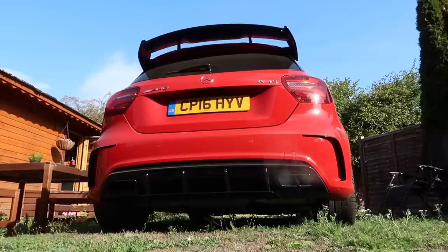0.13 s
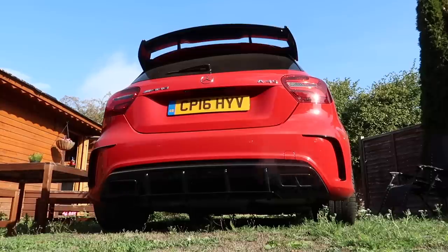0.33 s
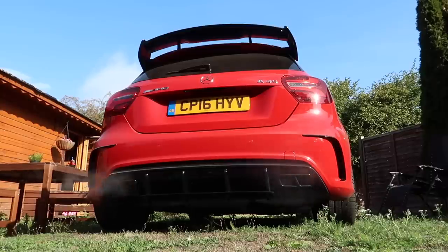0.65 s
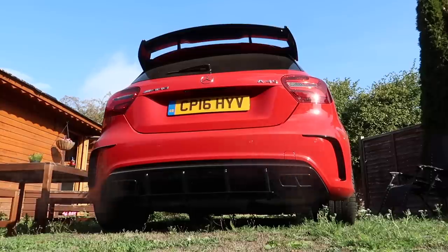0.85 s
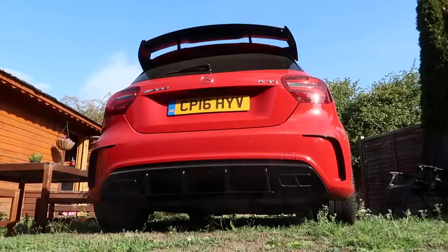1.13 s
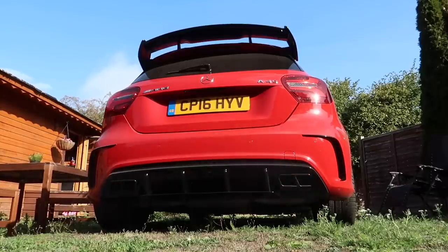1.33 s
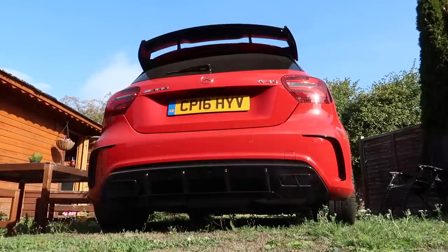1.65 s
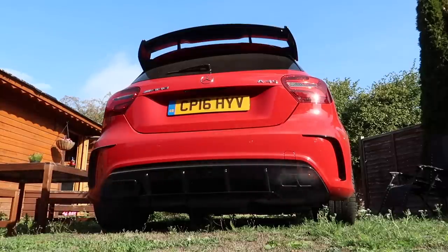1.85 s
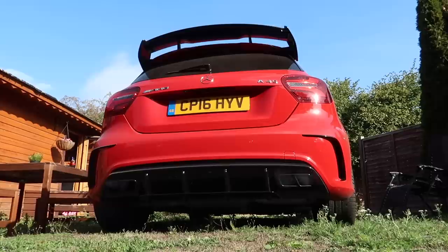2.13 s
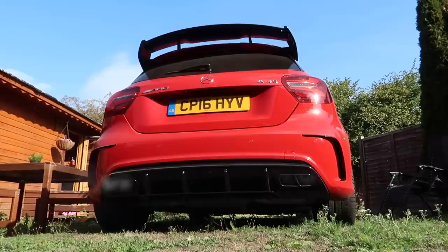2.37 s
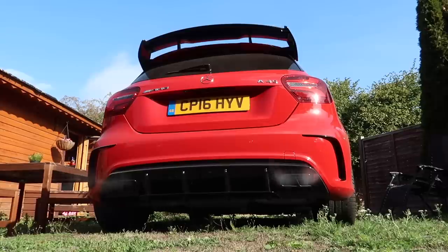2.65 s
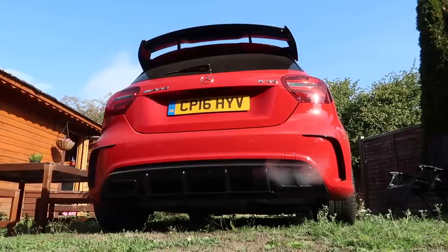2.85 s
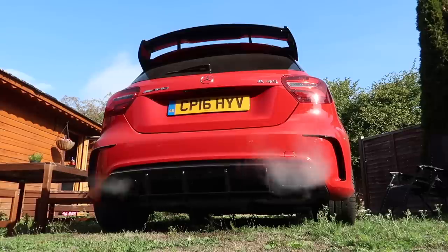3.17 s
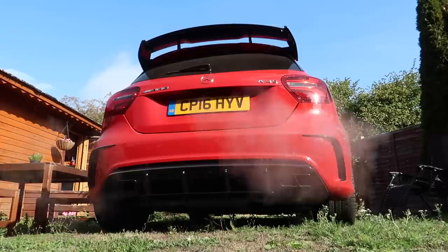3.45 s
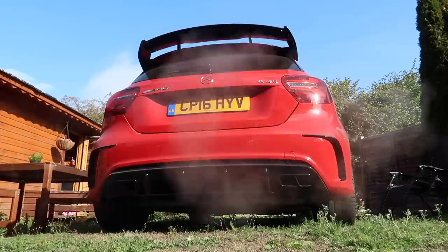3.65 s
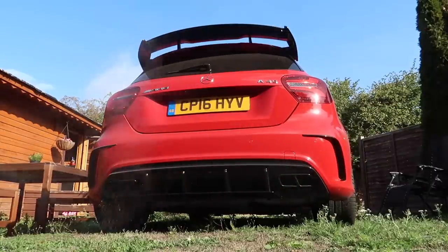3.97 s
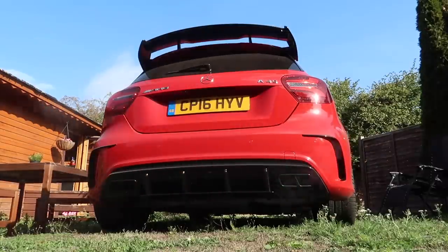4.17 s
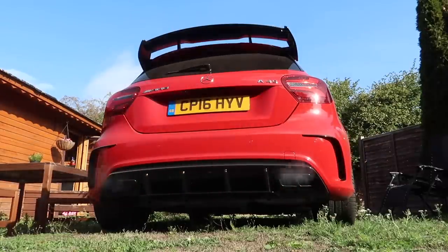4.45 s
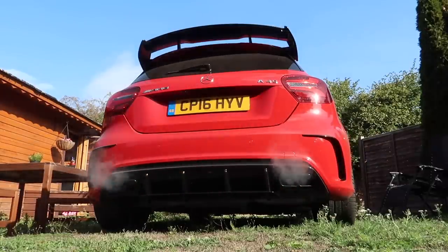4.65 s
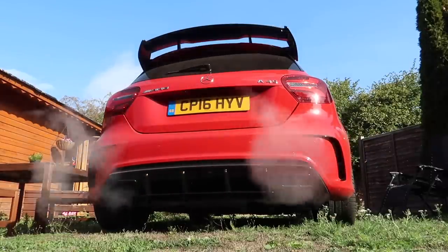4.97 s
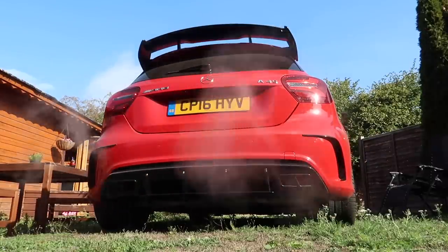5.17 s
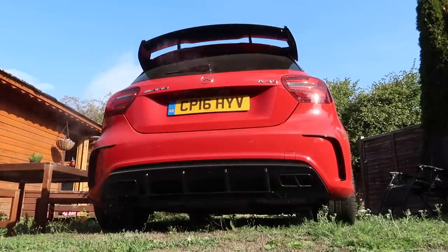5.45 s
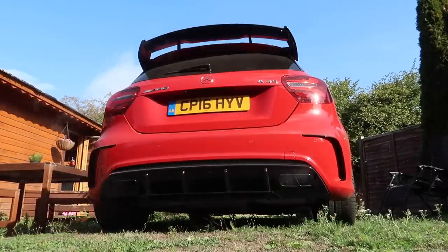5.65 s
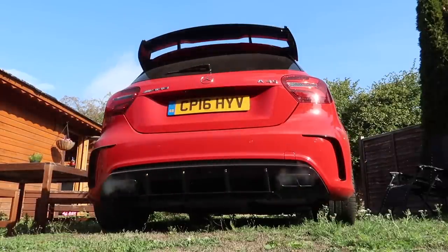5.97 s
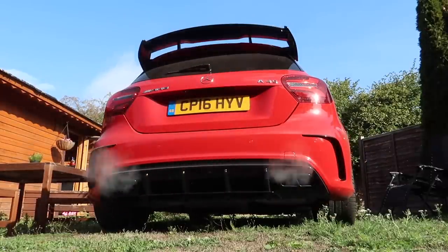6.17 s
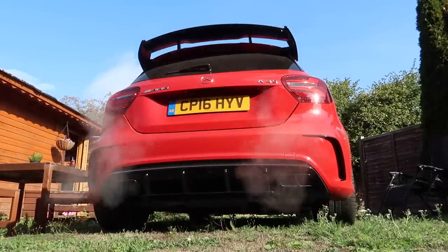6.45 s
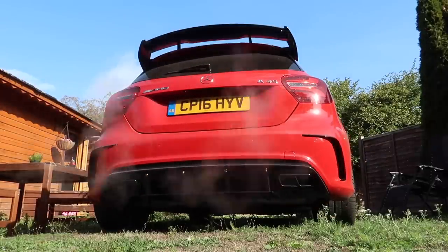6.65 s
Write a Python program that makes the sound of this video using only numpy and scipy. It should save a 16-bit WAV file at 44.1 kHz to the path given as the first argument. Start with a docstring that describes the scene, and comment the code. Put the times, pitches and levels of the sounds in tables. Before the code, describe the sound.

Close behind the tailpipes, a throbbing four-cylinder car engine revs three times, popping and burbling as it winds down after each blip.

```python
"""A turbocharged four-cylinder car idles in a garden, heard from just behind its tailpipes. Its firings
throb and boom in the silencer. At 0.5 s a stab of throttle makes them bark in the pipe and rasp out of
its end; as the revs fall, unburnt fuel burbles and pops. More stabs follow at 3.2 s and 5 s, each with
pops, and the revs sink away. Throughout, gas and turbo hiss, a wooden wall echoes the sharp sounds,
fences scatter a short tail, and the camera turns its volume down after loud pops."""
import sys
import numpy as np
from scipy import signal
from scipy.fft import rfft, irfft
from scipy.io import wavfile
from scipy.ndimage import uniform_filter1d

SR = 44100
rng = np.random.default_rng(int(sys.argv[2]) if len(sys.argv) > 2 else 0)


def log_audio(samples):
    """Write samples as a 16-bit WAV file to the path given in sys.argv[1]."""
    # one column per channel
    frames = np.atleast_2d(samples).T
    # limit to full scale, then quantise
    limited = np.clip(frames, -1, 1)
    pcm = np.round(limited * 32767).astype(np.int16)
    wavfile.write(sys.argv[1], SR, pcm)


N = 300274
TIME = np.arange(N) / SR

# engine speed (revs) as firings per second: t/s, f/Hz
FIRING_RATE = [(0.0, 47.8), (0.318, 37.5), (0.544, 36.5), (0.735, 65.3), (0.88, 90.5), (1.046, 125.1),
               (1.198, 127.5), (1.801, 102.0), (2.397, 80.1), (3.203, 53.5), (3.291, 65.4), (3.864, 181.8),
               (4.195, 172.5), (4.466, 155.9), (5.001, 133.0), (5.2, 171), (5.335, 198.5), (5.542, 194.5),
               (6.078, 165.3), (6.81, 132.0)]
# stabs of throttle; near the top of each the rasp flares (grows louder):
# opens t/s, flare starts t/s, shuts t/s, pedal depth/0-1, flare level/dB
THROTTLE_STABS = [(0.526, 1.072, 1.158, 0.85, 5.5), (3.228, 3.74, 3.953, 0.91, 10),
                  (4.972, 5.187, 5.445, 0.74, 19.5)]
# runs of heavy or weak firings off the throttle:
# middle t/s, half length/s, extra throb level/dB, extra overtone level/dB, extra bark and rasp level/dB
SURGES = [(0.102, 0.1, 1.5, 2.5, 7.5), (0.236, 0.1, 8.5, 4, 4.5), (0.345, 0.069, 13, -12, 7.5),
          (0.527, 0.07, 18, -27, 2), (1.213, 0.025, 0, 5, 4.5), (3.227, 0.051, 15, -15, 4),
          (6.776, 0.32, -2.5, 8.5, -0.5)]
# tones at which the silencer rings: f/Hz, width/Hz, level/dB
SILENCER_TONES = [(66.6, 70, 3.5), (112, 38, 1.5), (176.4, 20, 0.5), (249.6, 61, -2.5)]
# the boom swells where the firing rate meets a standing wave of the silencer: firing f/Hz, level/dB
BOOM_LEVELS = [(36, -18.5), (52, -22), (65, -15.5), (74, -18), (80.5, -22.5), (85, -19), (91, -18),
               (113, -15), (133, -18.5), (145, -17.5), (160, -22.5), (174, -15.5), (200, -14)]
# tones at which the pipe rings: f/Hz, width/Hz, level/dB
PIPE_TONES = [(471, 82, 5), (599, 56, -7.5), (771, 43, -3), (944.5, 140, -9.5)]
# under throttle the pipe is louder at some revs: firing f/Hz, extra bark level/dB, extra rasp level/dB
LOAD_BOOSTS = [(40.4, 5, 3.5), (65.4, -2.5, -0.5), (85.5, -1, 1.5), (104, 0, 7.5), (116, 3, 3),
               (131, -2.5, -2), (152, 4.5, 4), (178, -5, 2), (201.5, 2.5, -2.5)]
# tone shapes of the plain rasp and of the flaring rasp's shock waves: f/Hz, level/dB
RASP_SHAPE = [(600, -32), (1150, -20), (1650, 7), (2000, -0.5), (2450, -2.5), (2900, -21), (3800, -31),
              (7000, -46)]
SHOCK_SHAPE = [(100, 7.5), (550, -3.5), (1100, -8.5), (1900, 2.5), (3000, -12), (3700, -20), (4700, -33.5),
               (9000, -60), (15000, -76)]
# narrow, hollow tones in the rasp, mostly where the short echo reinforces it: f/Hz, width/Hz, level/dB
RASP_TONES = [(1360, 55, 3), (1672, 75, 3.5), (1945, 60, 0), (2100, 55, 2), (2410, 60, -1.5),
              (2990, 160, -12)]
# loudness of the gas and turbo hiss against revs: firing f/Hz, level/dB
HISS_LEVELS = [(36, -53.5), (47, -59), (55, -61), (85, -57.5), (122, -57.5), (140, -53.5), (200, -48)]
# tone shape of that hiss: f/Hz, level/dB
HISS_SHAPE = [(300, 3.5), (1500, 11), (2400, 6), (3300, 5.5), (4700, -1.5), (6800, -8), (8500, -14.5),
              (11000, -21), (15000, -36.5)]
# muffled burns deep in the exhaust: t/s, silencer level/dB, pipe level/dB
BURBLES = [(1.153, -15, -42), (4.852, -36, -33), (5.468, -18, -35), (5.542, -16.5, -24.5),
           (5.861, -22, -42), (6.35, -23, -30)]
# sharp pops: t/s, level/dB, offset for the snap level/dB, offset for the thump level/dB
POPS = [(1.469, -1, -27, -11), (1.512, -1.5, -16, -20), (1.611, 1, -18.5, -11), (1.6754, 5, -4.5, -19.5),
        (1.7705, 6.5, -8.5, -17.5), (1.7804, 2, -14, -11.5), (1.8372, -6.5, -21.5, -12),
        (1.869, 7, -10, -16), (1.929, 6, -14, -16.5), (3.8741, -7, -29, -17), (3.8967, -2, -32, -24),
        (3.913, -5, -35, -17), (4.2173, 0, 9, -10), (5.5232, -6.5, -28, -5.5), (5.6963, 0, -22.5, -10.5),
        (5.823, 0.5, -6, -14)]
# tone shapes of a pop's middle crack, high snap and low thump: f/Hz, level/dB
CRACK_SHAPE = [(300, -5.5), (750, 0.5), (1150, -7.5), (1500, -1), (1850, 4), (2600, 0.5), (3300, -10),
               (4600, -21.5), (14000, -62)]
SNAP_SHAPE = [(300, -27), (850, 12), (1400, -4), (3100, 17), (4500, -0.5), (6600, 1.5), (8300, -11),
              (10300, -7.5), (13500, -10), (15500, -23)]
THUMP_SHAPE = [(25, -7), (65, 7.5), (160, -3.5), (270, 3), (370, -12.5), (485, 3), (620, -12),
               (2500, -48.5), (9000, -86.5)]

# how layers follow the revs: level/dB at 100 firings a second and dB per doubling of the revs,
# first coasting (throttle shut), then at full throttle
THROB_LAW, OVERTONE_LAW = (-36, -2, -16, -3.5), (1.5, -1, -0.25, 2.7)
BARK_LAW, RASP_LAW = (-43, 3.5, -26.5, 7.5), (-54, 2.5, -37.5, 4.5)
WAVER_DB = 2.5  # scale of the random wavering off the throttle
BURBLE_S = 0.025  # time a burble takes to swell, and again to fade


def undb(db):
    """Turn decibels into a gain."""
    return 10 ** (np.asarray(db) / 20)


def ramp(start_s, length_s):
    """A rise from 0 to 1."""
    return np.clip((TIME - start_s) / length_s, 0, 1)


def hump(peak_s, half_s):
    """A rise from 0 to 1 and back."""
    return np.interp(TIME, [peak_s - half_s, peak_s, peak_s + half_s], [0, 1, 0])


def wander(rate_hz=7):
    """A random curve that drifts up and down a few times a second."""
    count = int(rate_hz * N / SR) + 2
    return 1.9 * np.interp(TIME * rate_hz, np.arange(count), rng.standard_normal(count))


def add(track, start_s, sound):
    """Mix a short sound into a track."""
    i = int(start_s * SR)
    track[i:i + len(sound)] += sound[:N - i]


def steady(x, size=3000):
    """Hold the level near 1 over about 70 ms; single firings still differ."""
    return x / np.sqrt(uniform_filter1d(uniform_filter1d(x ** 2, size), size) + 1e-12)


def band(x, lo_hz, hi_hz, order=2):
    """Keep the part of a sound between two frequencies."""
    return signal.sosfilt(signal.butter(order, [lo_hz, hi_hz], "band", fs=SR, output="sos"), x)


def above(x, lo_hz, order):
    """Keep the part of a sound above a frequency, without delaying it."""
    return signal.sosfiltfilt(signal.butter(order, lo_hz, "high", fs=SR, output="sos"), x)


def filter_by(x, gain_at, size=4096):
    """Filter by a gain curve, scaled so that white noise would keep its power."""
    hz = np.maximum(np.fft.rfftfreq(size, 1 / SR), 1)
    cepstrum = irfft(np.log(gain_at(hz) + 1e-6))
    # fold it so that the ringing comes after a sound, never before
    cepstrum[1:size // 2] *= 2
    cepstrum[size // 2 + 1:] = 0
    kernel = irfft(np.exp(rfft(cepstrum)))
    return signal.fftconvolve(x, kernel / np.linalg.norm(kernel))[:len(x)]


def shape(x, points):
    """Give a sound a smooth tone shape."""
    f, db = np.transpose(points)
    return filter_by(x, lambda hz: undb(np.interp(np.log(hz), np.log(f), db)))


def response(tones, hz):
    """How strongly a filter with peaks at these tones passes each frequency."""
    return np.sqrt(sum(undb(db) ** 2 / (1 + ((hz ** 2 - f ** 2) / (width * hz)) ** 2) ** 2
                       for f, width, db in tones))


def ring(x, tones):
    """Make a sound ring at these tones."""
    return filter_by(x, lambda hz: response(tones, hz))


def pedal(open_s=0.034, shut_s=0.025):
    """How far the throttle is open (0-1), and the flare (dB) at the top of each stab."""
    throttle, flare_db = np.zeros((2, N))
    for opens, flares, shuts, depth, db in THROTTLE_STABS:
        held = ramp(opens, open_s) - ramp(shuts, shut_s)
        throttle += depth * held
        flare_db += db * held * ramp(flares, 0.6 * (shuts - flares))
    return throttle, flare_db


def law_db(law, hz, throttle):
    """A layer's level at these revs, between coasting and full throttle."""
    coast_db, coast_slope, full_db, full_slope = law
    octaves = np.log2(hz / 100)
    coasting_db = coast_db + coast_slope * octaves
    return (1 - throttle) * coasting_db + throttle * (full_db + full_slope * octaves)


def per_firing(cycles):
    """A new random value at each firing (cycles counts them): no two burns are alike."""
    count = int(cycles[-1]) + 3
    return np.interp(cycles, np.arange(count), rng.standard_normal(count))


def firing_strength(cycles, scatter_db):
    """A random gain for each firing."""
    return undb(scatter_db * per_firing(cycles))


def throb(cycles, hz, throttle, flare_db, surge_db, overtone_surge_db):
    """The engine's low tones sweep through the silencer's ringing and waver off the throttle."""
    grid_hz = np.arange(1, 1300)
    passed = response(SILENCER_TONES, grid_hz)
    # at low revs the silencer shifts the overtones, so each firing is a push and then a suck
    shift = 2 * np.clip(1 - hz / 130, 0, 1)
    waver_db = WAVER_DB * (1 - throttle) * np.clip(hz / 40 - 1, 0, 1)
    tones = 0
    for multiple in np.arange(3, 17) / 2:
        # unequal cylinders add weak tones halfway between the overtones
        gain = undb(np.interp(hz, [150, 200], [-19, -8])) if multiple % 1 else 1
        gain = gain * undb(waver_db * wander()) * multiple ** -.9
        gain *= np.interp(multiple * hz, grid_hz, passed)
        tones -= gain * np.cos(2 * np.pi * multiple * cycles - shift)
    tones = steady(tones * firing_strength(cycles, scatter_db=np.clip(115 / hz, 0, 2.9)))
    # gas churns in the silencer when the engine coasts at high revs
    churn = steady(band(ring(rng.standard_normal(N), SILENCER_TONES), 90, 340))
    churn_db = -17.5 + 18.5 * (1 - throttle) * np.clip(hz / 130, 0, 1)
    sound = steady(tones * undb(waver_db * wander()) + undb(churn_db) * churn)
    overtone_db = overtone_surge_db + law_db(OVERTONE_LAW, hz, throttle)
    sound += (undb(overtone_db) - 1) * above(sound, 260, order=3)
    # near idle the fuel comes back, and the throb with it
    idle_db = 10 * (1 - throttle) * np.clip(1 - (hz - 49.7) / 23, 0, 1)
    return undb(law_db(THROB_LAW, hz, throttle) + idle_db + surge_db - 0.32 * flare_db) * sound


def boom(cycles, hz, throttle, flare_db):
    """The silencer booms at the firing rate and sags after a fuel cut, a pop or a burble."""
    cuts = sum(hump(shuts + 0.073, 0.069) for _, _, shuts, _, _ in THROTTLE_STABS)
    pop_dips = [hump(s + 0.014, 0.025) for s, *_ in POPS]
    burble_dips = [hump(s + BURBLE_S, BURBLE_S) for s, *_ in BURBLES]
    level_db = np.interp(hz, *np.transpose(BOOM_LEVELS)) + 5.5 * throttle - 0.49 * flare_db
    level_db -= 7 * cuts + 7.5 * np.max(pop_dips + burble_dips, axis=0)
    tone = -np.sqrt(2) * np.cos(2 * np.pi * cycles)
    return undb(level_db) * tone * firing_strength(cycles, scatter_db=0.96)


def exhaust_pulses(cycles, hz, gas, scatter_db, puff_cycles):
    """Each firing lets out a kick of pressure and a quickly fading puff of noisy gas."""
    # each comes a little early or late, which roughens the high overtones
    cycles = cycles + np.clip(1.5 / hz, 0, .025) * per_firing(cycles)
    starts = np.flatnonzero(np.diff(np.floor(cycles))[:-1]) + 1
    share = np.clip(cycles[starts] % 1 * SR / hz[starts], 0, 1)
    kicks = np.zeros(N)
    kicks[starts], kicks[starts + 1] = share, 1 - share  # split between two samples
    jet = (np.exp(-(cycles % 1) / puff_cycles) + 0.84) * rng.standard_normal(N)
    return firing_strength(cycles, scatter_db) * (gas * steady(jet) - kicks * np.sqrt(SR / hz))


def bark(cycles, hz, throttle, flare_db, extra_db):
    """The pulses ring the pipe; off the throttle they give way to gas noise."""
    level_db = law_db(BARK_LAW, hz, throttle) + 0.2 * flare_db + extra_db
    level_db += .5 * WAVER_DB * (1 - throttle) * wander()
    gas = np.interp(hz, [50, 120, 170, 195], [1.25, 1, 1, 1.35]) - .9 * throttle
    pulses = exhaust_pulses(cycles, hz, gas, scatter_db=1.5, puff_cycles=.35)
    sound = band(ring(pulses, PIPE_TONES), 410, 1500, order=3)
    # at top revs the bark moves to the pipe's higher tones
    thinning = np.interp(hz, [170, 192], [0, .7]) * throttle
    sound += thinning * (above(sound, 540, order=6) - sound)
    return undb(level_db) * steady(sound)


def rasp(cycles, hz, throttle, flare_db, extra_db):
    """The pulses rasp out of the tailpipe, with narrow, hollow tones in the sound."""
    bite_db = 2.5 * sum(hump(opens + 0.038, 0.038) for opens, *_ in THROTTLE_STABS)
    level_db = law_db(RASP_LAW, hz, throttle) + flare_db + extra_db + bite_db
    # slow firings are soft, ragged puffs; fast ones under throttle are hard pulses
    gas = np.interp(hz, [50, 100, 150], [1.3, .7, .35]) + 1.7 * (1 - throttle) ** 2
    scatter_db = np.interp(hz, [120, 190], [3, 2])
    pulses = exhaust_pulses(cycles, hz, gas, scatter_db, puff_cycles=.3)
    # as the rasp flares the pulses steepen into shock waves, every other one stronger
    steep = np.clip(flare_db / 16.5, 0, 1)
    shocks = steady(shape(pulses * undb(5 * np.cos(np.pi * cycles)), SHOCK_SHAPE))
    outflow = (1 - steep) * steady(shape(pulses, RASP_SHAPE)) + steep * undb(3.5) * shocks
    hollow = steady(ring(pulses, RASP_TONES))
    return undb(level_db) * wall_echo(undb(-4) * outflow + undb(-2.5) * hollow, gain=0.19, lo_hz=600)


def engine(hz, throttle, flare_db):
    """The same firings drive the throb, boom, bark and rasp."""
    cycles = np.cumsum(hz) / SR
    drive = cycles, hz, throttle, flare_db
    surges_db = sum(np.outer(levels_db, hump(s, half_s)) for s, half_s, *levels_db in SURGES)
    throb_db, overtone_db, growl_db = (1 - throttle) * surges_db
    revs, bark_boost, rasp_boost = np.transpose(LOAD_BOOSTS)
    bark_db = growl_db + throttle * np.interp(hz, revs, bark_boost)
    rasp_db = growl_db + throttle * np.interp(hz, revs, rasp_boost)
    low = throb(*drive, throb_db, overtone_db) + boom(*drive)
    return low + bark(*drive, bark_db) + rasp(*drive, rasp_db)


def hiss(hz, throttle, flare_db):
    """Gas and turbo make a smooth rush, a little different at each ear."""
    level_db = np.interp(hz, *np.transpose(HISS_LEVELS)) + 3.5 * throttle + 0.17 * flare_db
    middle, side = (shape(rng.standard_normal(N), HISS_SHAPE) for _ in range(2))
    middle = wall_echo(middle, gain=.35, lo_hz=600)
    return undb(level_db) * (middle + 0.42 * side * np.array([[1], [-1]]))


def wall_echo(x, gain, lo_hz, delay_s=0.00688):
    """A sound plus its upper part, which the wooden wall sends back late and upside down."""
    return x - gain * np.interp(TIME - delay_s, TIME, above(x, lo_hz, order=1), left=0)


def garden(x, fade_s, treble_fade_s, size=16000):
    """Fences, shed and hedge scatter a short tail; only its treble differs between the ears."""
    t = np.arange(size) / SR
    onset = 1 - np.exp(-t / 0.0033)
    body = band(rng.standard_normal(size), 300, 2900) * undb(-60 * t / fade_s)
    treble = band(rng.standard_normal((2, size)), 3800, 14000) * undb(-60 * t / treble_fade_s)
    tail = onset * (body + 0.36 * treble)
    return signal.fftconvolve(x[None], tail / np.linalg.norm(tail[0]), axes=1)[:, :N]


def burbles():
    """Fuel burns softly deep in the exhaust: the silencer rumbles and the pipe gives a hollow roar."""
    low, hollow = sum(np.outer(undb(dbs), hump(s + BURBLE_S, BURBLE_S)) for s, *dbs in BURBLES)
    rumble = low * steady(ring(rng.standard_normal(N), SILENCER_TONES))
    return rumble + hollow * steady(ring(rng.standard_normal(N), PIPE_TONES))


def bang(gap_s, front, fizz, fizz_s, size=2400):
    """Fuel catches fire: a pressure front, a stronger shock just behind it, and a short fizz of gas."""
    t = np.arange(size) / SR
    burst = fizz * np.exp(-t / fizz_s) * rng.standard_normal(size)
    burst[0] -= front
    burst[int(gap_s * SR)] -= 1
    return burst


def crackle(decay_s=0.022, size=4000):
    """Scattered specks of burning fuel die away after a pop."""
    specks = rng.standard_normal(size) * (rng.random(size) < .08)
    specks *= np.exp(-np.arange(size) / (decay_s * SR))
    return specks / np.linalg.norm(specks)


def pops():
    """Unburnt fuel explodes: it cracks at the tips, snaps in the treble and thumps in the silencer."""
    crack, snap, thump = np.zeros((3, N))
    for s, db, snap_db, thump_db in POPS:
        gap_s = rng.uniform(.0007, .0015)
        add(crack, s, undb(db) * bang(gap_s, front=.35, fizz=.06, fizz_s=.003))
        add(snap, s, undb(db + snap_db) * bang(gap_s, front=.3, fizz=.11, fizz_s=.003))
        # the sharper the pop, the nearer the tips it burns and the less deep bass it stirs
        lowest_hz = np.interp(snap_db, [-25, -8, 5], [15, 45, 200])
        thud = band(bang(gap_s, front=.2, fizz=.05, fizz_s=.009), lowest_hz, 9000, order=1)
        add(thump, s, undb(db + thump_db) * thud)
        add(snap, s, undb(db - 8 + 0.8 * snap_db) * crackle())
    crack = wall_echo(undb(8) * shape(crack, CRACK_SHAPE), gain=0.53, lo_hz=714)
    snap = wall_echo(undb(5) * shape(snap, SNAP_SHAPE), gain=0.71, lo_hz=1200)
    return crack + snap + undb(26) * shape(thump, THUMP_SHAPE)


def auto_volume(x, threshold_db=-16.5, attack_s=0.019, recover_db_per_s=6):
    """Loud treble quickly pulls the volume down; it then creeps back up."""
    power = uniform_filter1d(band(x.mean(axis=0), 1200, 15000) ** 2, 176)  # over 4 ms
    over_db = np.maximum(10 * np.log10(np.maximum(power, 1e-12)) - threshold_db, 0)
    recovered_db = recover_db_per_s * TIME
    held_db = np.maximum.accumulate(over_db + recovered_db) - recovered_db
    smoothing = np.exp(-1 / (attack_s * SR))
    return x * undb(-signal.lfilter([1 - smoothing], [1, -smoothing], held_db))


def scene():
    """The exhaust is straight ahead; its upper tones lean left and reach that side a little earlier."""
    hz = np.interp(TIME, *np.transpose(FIRING_RATE))
    throttle, flare_db = pedal()
    motor = engine(hz, throttle, flare_db) + burbles()
    bangs = pops()
    direct = motor + bangs
    side = .06 * band(direct, 400, 12000) + .28 * np.gradient(direct)
    # the camera's body scatters the top treble differently to each microphone
    side += .65 * np.roll(band(direct, 5500, 15000), 14)
    tail = garden(undb(-11) * bangs + undb(-10) * motor, fade_s=0.14, treble_fade_s=0.17)
    return direct + side * np.array([[1], [-1]]) + tail + hiss(hz, throttle, flare_db)


def record(dry):
    """The camera drops the deepest bass, dips after pops, flattens the loudest peaks and cuts the top."""
    x = signal.sosfilt(signal.butter(2, 18, "high", fs=SR, output="sos"), dry)
    x = np.clip(auto_volume(x), -1, 1)
    return signal.sosfilt(signal.ellip(8, .2, 70, 15600, fs=SR, output="sos"), x)


dry = scene()
out = record(dry)
log_audio(out)
```